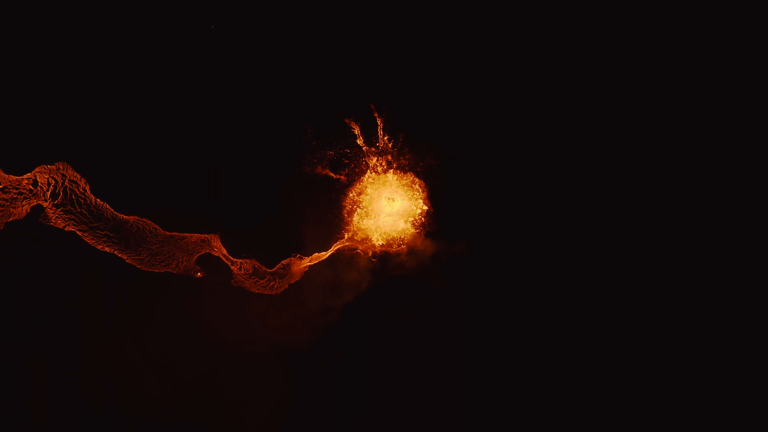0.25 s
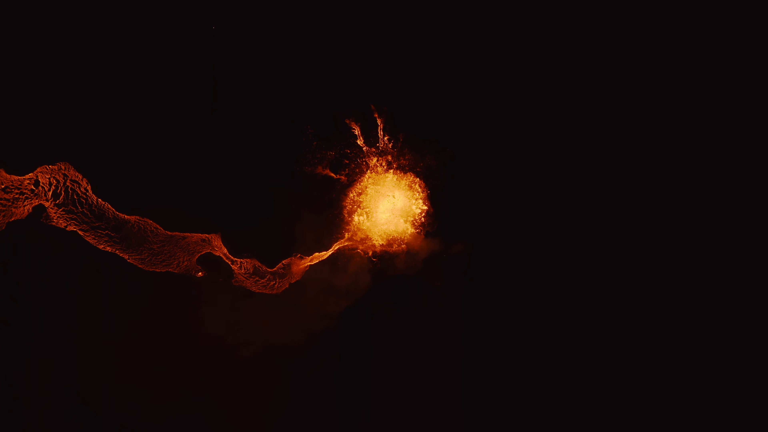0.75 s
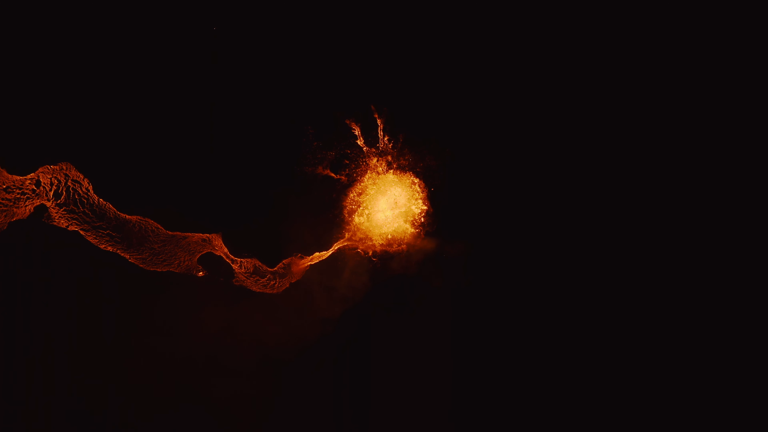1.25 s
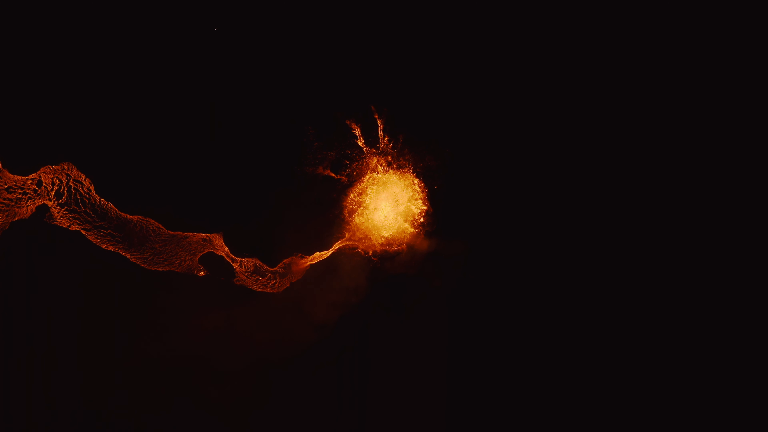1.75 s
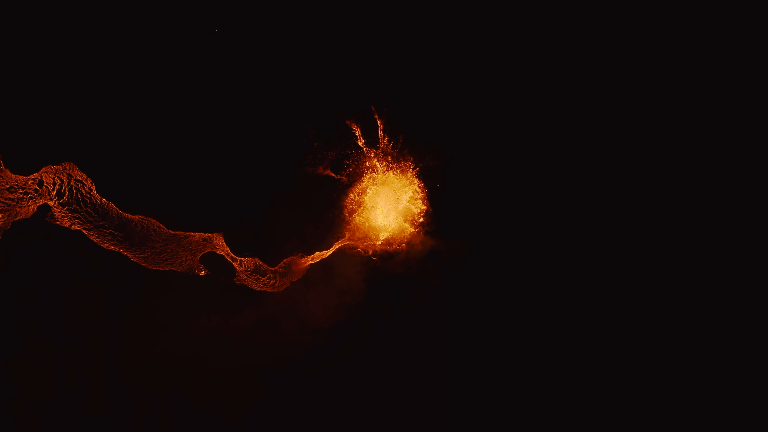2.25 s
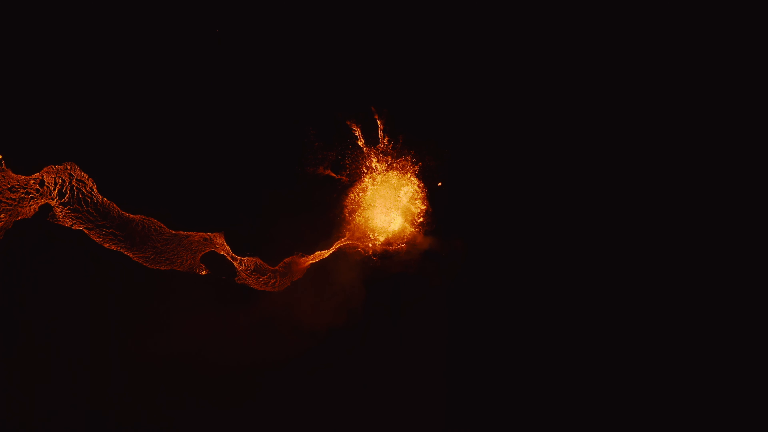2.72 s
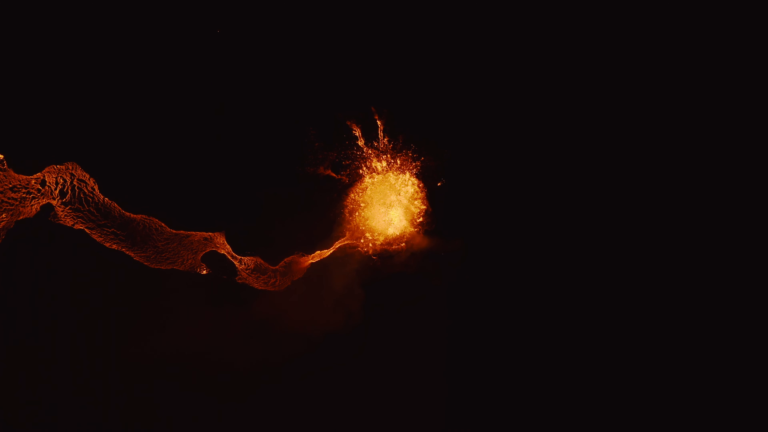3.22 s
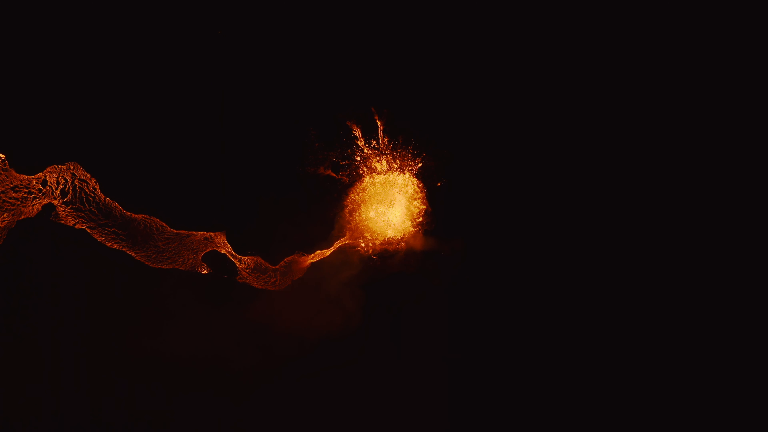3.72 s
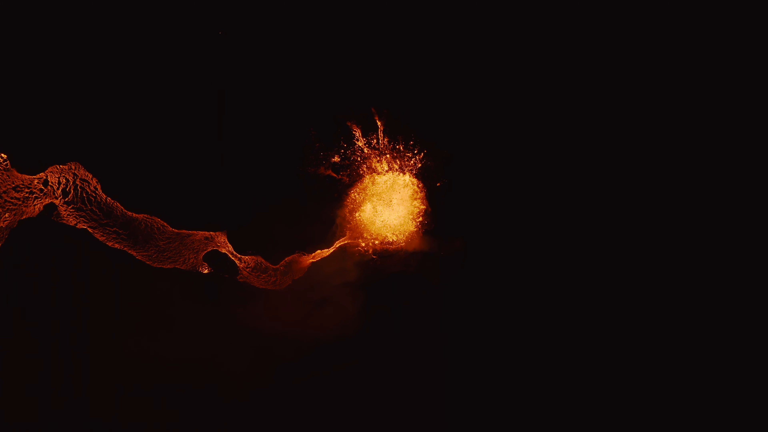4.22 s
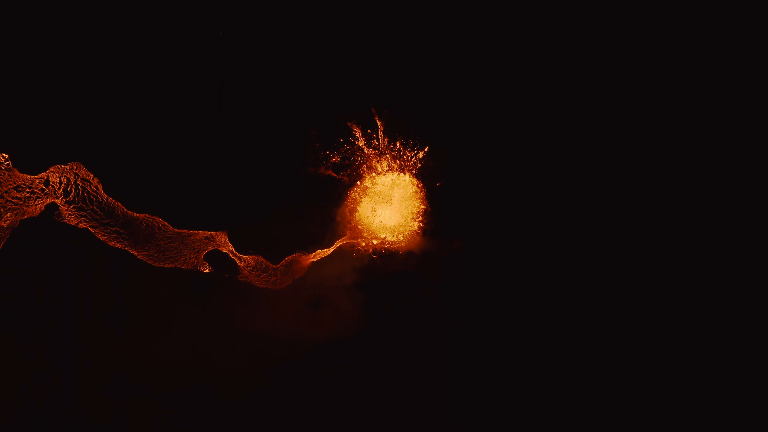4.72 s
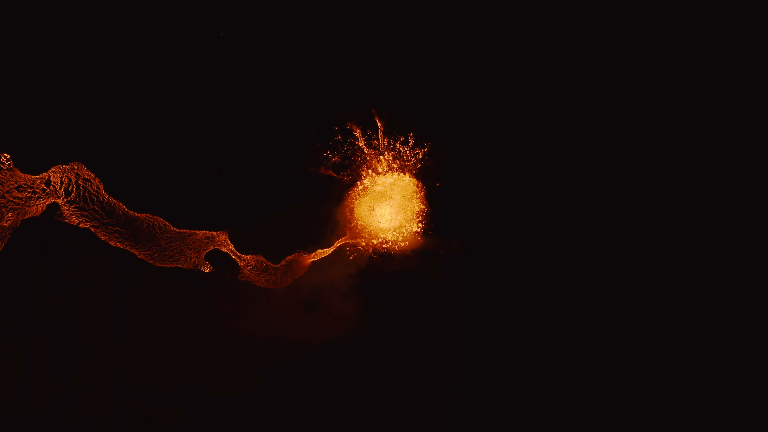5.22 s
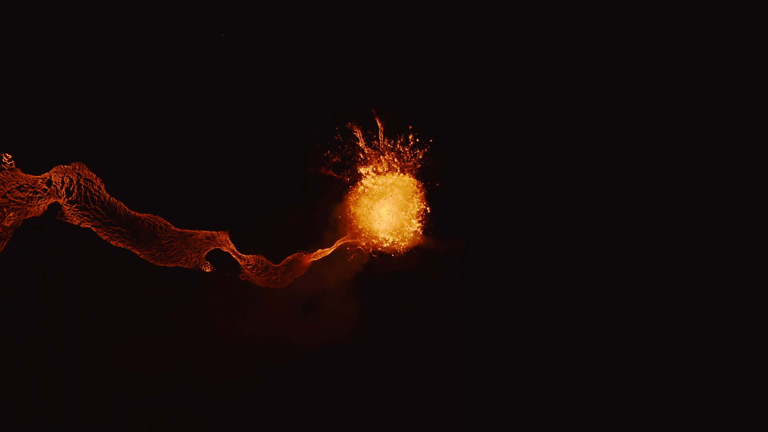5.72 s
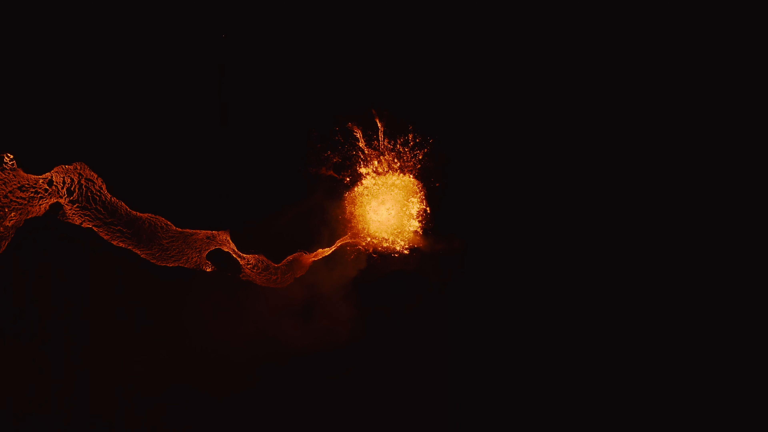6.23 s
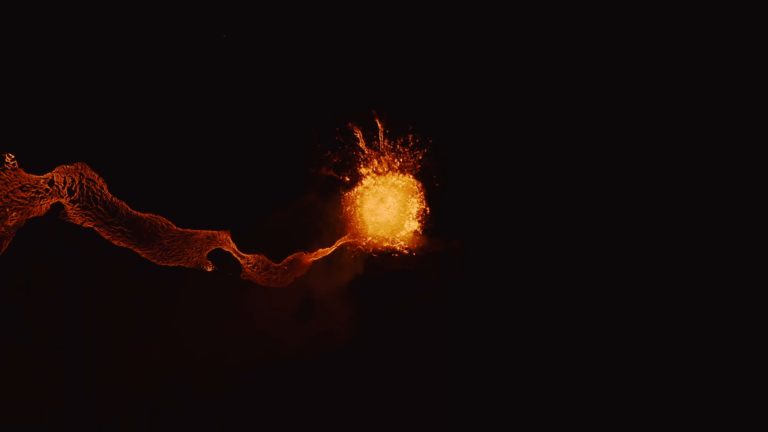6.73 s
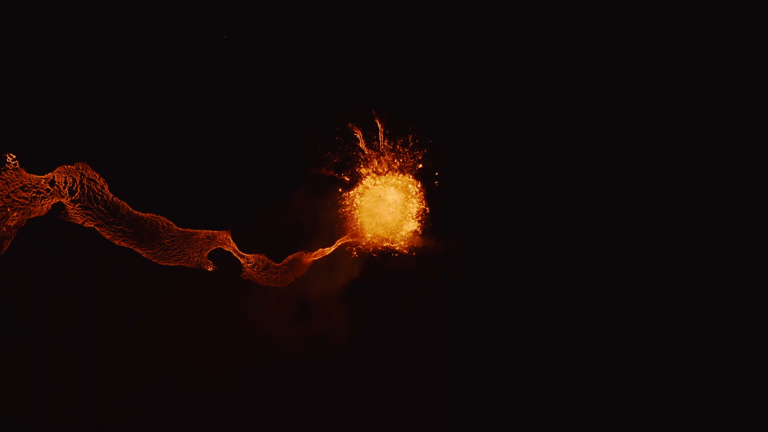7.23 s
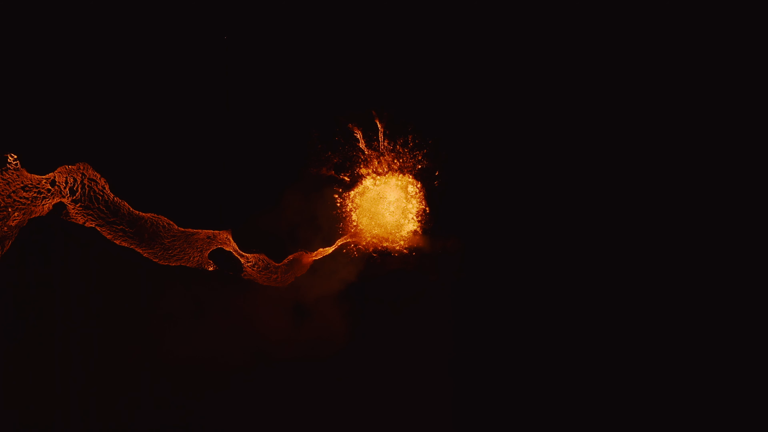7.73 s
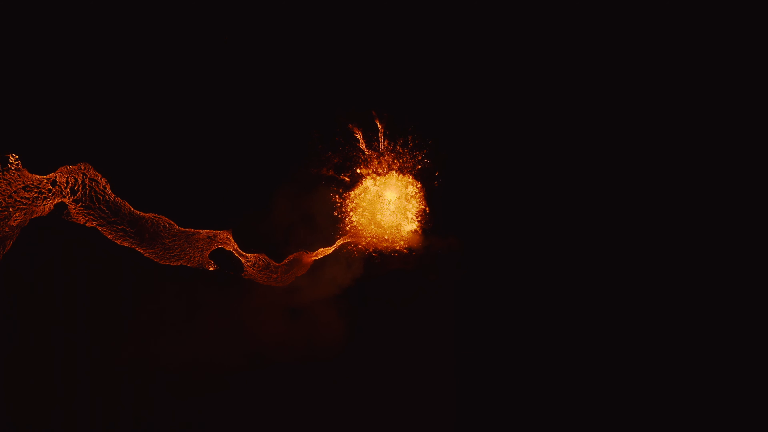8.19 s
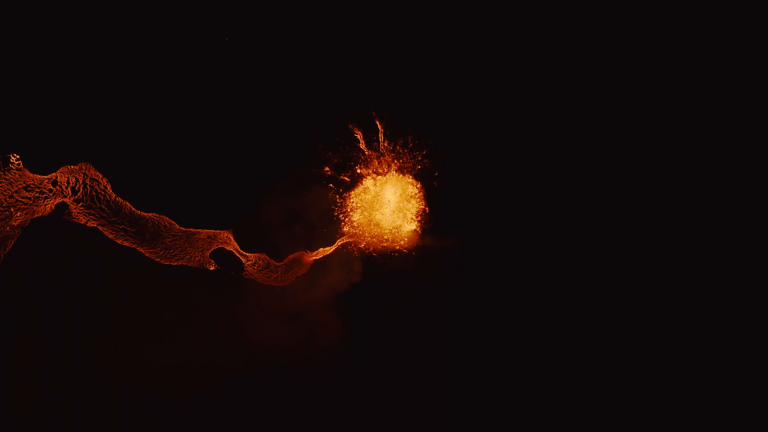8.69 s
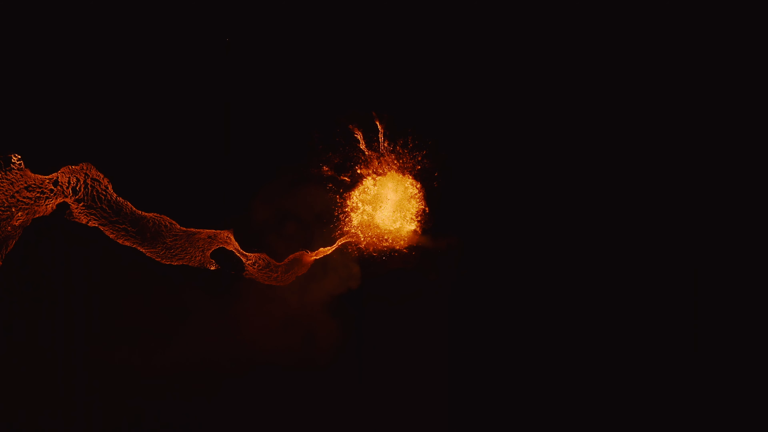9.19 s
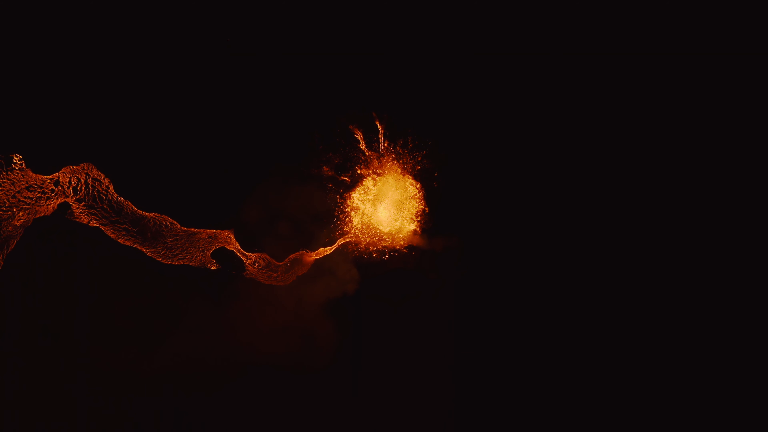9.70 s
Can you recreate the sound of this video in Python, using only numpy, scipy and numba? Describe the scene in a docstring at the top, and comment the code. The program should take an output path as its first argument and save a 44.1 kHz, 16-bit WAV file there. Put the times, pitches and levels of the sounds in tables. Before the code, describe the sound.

Outdoors at night, an erupting crater heard from some way off gives a deep, hollow, throbbing rumble under a muffled, crackling gas roar. It eases slightly, then surges after three seconds into a cluster of heavy thuds and pops, and afterwards continues unevenly. Near the microphone, low gusts flutter softly and small ash grains tick faintly.

```python
"""A volcanic crater at night, heard from some way off: bursting gas slugs make a deep rumble of filtered
impulses and noise that rings with the crater. Over it roars a gas jet, noise mixed with small shocks,
which surges after three seconds. The biggest slugs thud and pop as single pulses. The vent arrives
directly and off the ground. Close by, low noise in gusts buffets the microphone, and small grains,
perhaps ash, tick down as clicks with short noise tails."""
import sys
import numpy as np
from scipy import signal
from scipy.fft import rfft, irfft, next_fast_len
from scipy.io import wavfile
from numba import njit

SR = 44100
rng = np.random.default_rng(int(sys.argv[2]) if len(sys.argv) > 2 else 0)


def generate_wav(sig):
    """Save sig (samples, or channels by samples) to the path in sys.argv[1] as 16-bit PCM at SR."""
    pcm = np.round(np.clip(np.atleast_2d(sig).T, -1, 1) * 32767).astype(np.int16)
    wavfile.write(sys.argv[1], SR, pcm)


N = 438794


def undb(db):
    """Decibels to gain."""
    return 10 ** (np.asarray(db) / 20)


def unit(x):
    """Scale to rms 1."""
    return x / np.sqrt(np.mean(x ** 2))


def curve(points):
    """(time [s], value) points joined by straight lines."""
    return np.interp(np.arange(N) / SR, *np.transpose(points))


def swell(s, length):
    """A smooth rise and fall that peaks at 1 at time s and stays above one half for length seconds."""
    distance = 2 * (np.arange(N) / SR - s) / length
    return np.exp2(-np.minimum(distance ** 2, 20))


def walk(rate):
    """Random drift with a new target rate times a second, joined by straight lines; spread near 1."""
    knots = rng.standard_normal(4096)
    return 1.2 * np.interp(np.arange(N) / SR * rate, np.arange(len(knots)), knots)


def shower(rate, spread_db):
    """Impulses at random moments, rate a second, of either sign and unequal but bounded size; rms 1."""
    falls = rng.random(N) < rate / SR
    size = undb(spread_db * np.clip(rng.standard_normal(N), -2, 2))
    return unit(falls * rng.choice([-1, 1], N) * size)


def colour(x, points):
    """Causal filter with the gain of (frequency [Hz], level [dB]) points; steeper above the last one."""
    size = next_fast_len(N + SR // 2, True)
    hz, db = np.transpose(points)
    freqs = np.maximum(np.arange(size // 2 + 1) * SR / size, 1)
    gain = undb(np.interp(np.log(freqs), np.log(hz), db))
    gain *= np.minimum(hz[-1] / freqs, 1) ** 3
    # folding the cepstrum forward gives minimum phase, so nothing sounds ahead of its cause
    cepstrum = irfft(np.log(gain), size)
    cepstrum[1:size // 2] *= 2
    cepstrum[size // 2 + 1:] = 0
    response = np.exp(rfft(cepstrum))
    return irfft(rfft(x, size) * response, size)[:N]


def split(x, hz):
    """The parts of a sound below and above a frequency."""
    low = signal.sosfiltfilt(signal.butter(3, hz, fs=SR, output="sos"), x)
    return low, x - low


@njit
def resonate(x, hz, width_share):
    """Band-pass with gain 1 at a centre that may move; its width is a share of the centre."""
    y, band, low = np.empty(len(x)), 0., 0.
    for i in range(len(x)):
        g = np.tan(np.pi * hz[i] / SR)
        v = (band + g * (x[i] - low)) / (1 + g * (g + width_share))
        band, low, y[i] = 2 * v - band, low + 2 * g * v, width_share * v
    return y


# gusts that strike the microphone: (time [s], length [s], relative level [dB])
GUSTS = [(0.128, 0.061, -29), (0.606, 0.048, -39), (4.082, 0.3, -35), (5.906, 0.019, -28),
         (6.196, 0.068, -33.5), (6.48, 0.22, -31), (6.63, 0.13, -27), (7.14, 0.11, -31), (7.28, 0.11, -29),
         (7.428, 0.033, -25.5), (7.88, 0.076, -29.5), (8.176, 0.06, -30), (8.5, 0.048, -28),
         (8.92, 0.14, -34), (9.485, 0.049, -35), (9.837, 0.12, -27.5)]


def gusts():
    """Power of the gusts over time, each one a smooth shove of air."""
    return sum(undb(db) ** 2 * swell(s, length) for s, length, db in GUSTS)


# light breeze at the microphone: (time [s], relative level [dB])
BREEZE = [(0, -46.5), (1, -50.5), (2.3, -43.5), (3.2, -47), (5.2, -45.5), (6.5, -46), (8.5, -38.3),
          (9.95, -41.5)]
# spectrum of air buffeting the microphone: (frequency [Hz], relative level [dB])
WIND_SPECTRUM = [(6, -9.5), (15, -7), (28, 3.5), (42, 2.5), (60, 0), (85, -8), (150, -28), (400, -53.5)]


def wind(buffet_db=-0.5, breeze_gain_db=3.5, gust_gain_db=0.2):
    """Eddies push on the microphone in slow, uneven shoves: a light breeze with short gusts."""
    breeze = undb(curve(BREEZE) + breeze_gain_db + buffet_db * walk(rate=14))
    power = breeze ** 2 + undb(gust_gain_db) ** 2 * gusts()
    turbulence = unit(colour(rng.standard_normal(N), WIND_SPECTRUM))
    return turbulence * np.sqrt(power)


# larger grains landing nearby: (time [s], relative peak [dB], brightness [0-1])
TICKS = [(0.411, -55, 0.8), (0.511, -50, 0.6), (0.612, -58, .7), (0.73, -45, 0.9), (0.835, -55, 0.9),
         (0.899, -52, 0.3), (0.948, -59, .6), (1.407, -57, .4), (1.52, -56, .5), (1.567, -56, 1),
         (1.682, -54, 0.8), (2.125, -43.5, 0), (2.298, -59, .7), (2.422, -59, 0.7), (2.434, -53, .6),
         (2.613, -58, 0.9), (2.653, -54, 0.8), (2.879, -53.5, 1.0), (3.089, -48, 0.8), (3.199, -60, .8),
         (3.56, -52.5, 0.96), (3.631, -56, 0.6), (4.123, -42, 0.25), (4.59, -56, 1), (4.695, -59, 0.9),
         (4.824, -60, 1), (4.927, -54, 0.4), (5.04, -59, 0.5), (5.224, -62, .7), (5.357, -58, .8),
         (5.593, -58, .7), (5.742, -57, .6), (5.985, -45, 0.5), (6.2, -53.5, 0.7), (6.322, -52, 0.9),
         (6.394, -60, .7), (6.697, -62, 1), (6.972, -55, 0.7), (7.026, -55, 1.0), (7.402, -55, 0.7),
         (8.083, -59, .7), (8.254, -52.5, 0.8), (8.36, -53, 1.0), (8.452, -49, 0.1), (8.632, -58, .7),
         (8.808, -58, .9), (9.016, -56, .7), (9.114, -56, .9), (9.276, -54, 1.0), (9.29, -56, .8),
         (9.303, -58, .9), (9.5, -55, .9)]
REBOUND_S, REBOUND_DB = 0.0015, -8  # each grain hops once


def ticks(tick_db=10, rattle_db=-18, rattle_t60=0.0085, scatter_db=-30, scatter_t60=0.054):
    """A larger grain lands with a dry tick, hops once and stirs the grit; a soft landing is dull."""
    t = np.arange(SR // 10) / SR
    out = np.zeros(N + len(t))
    low_pass = signal.butter(4, 7500, fs=SR)
    high_pass = signal.butter(4, 7500, "highpass", fs=SR)
    for s, db, brightness in TICKS:
        grit = undb(rattle_db - 60 * t / rattle_t60) + undb(scatter_db - 60 * t / scatter_t60)
        tick = grit * rng.standard_normal(len(t))
        tick[0] += 1
        tick[int(REBOUND_S * SR)] += undb(REBOUND_DB)
        dull = signal.lfilter(*low_pass, tick)
        bright = signal.lfilter(*high_pass, tick)
        start = int(s * SR)
        out[start:start + len(t)] += undb(db + tick_db) * (dull + brightness * bright)
    return out[:N]


# brief trickles of grit: (time [s], relative level [dB], length [s])
TRICKLES = [(1.202, -70, .022), (2.775, -79, 0.02), (4.453, -81, .02), (5.33, -78, .016),
            (7.415, -73, 0.021), (7.985, -70, .02), (8.55, -80, .05), (9.2, -79, 0.025),
            (9.432, -71, 0.024)]
# spectrum of landing grains: (frequency [Hz], relative level [dB])
GRAIN_SPECTRUM = [(1500, -26.5), (3500, -10.5), (4500, 0), (5300, -1), (6000, 3), (7100, -1.5), (8700, -7),
                  (9600, -5.5), (10600, -8.5), (12000, -5.5), (14000, -17), (16000, -21.5)]
# fine grains sift down ever more thickly
SIFT_START_DB, SIFT_RISE_DB_PER_S = -81.5, 0.4


def grains(small_db=-1.5, rattle_t60=0.007, hiss_db=0.0, blown_db=-50):
    """Ticks over a patter of small grains; the finest merge into a faint sizzle that gusts thicken."""
    t = np.arange(N) / SR
    sift = undb(SIFT_START_DB + SIFT_RISE_DB_PER_S * t)
    landings = np.abs(shower(rate=45, spread_db=3.5))
    decay = undb(-60 * t[:SR // 10] / rattle_t60)
    rattles = signal.fftconvolve(landings, decay)[:N]
    patter = unit(rattles * rng.standard_normal(N))
    # smaller, slower grains land more softly, so their ticks are duller
    small = signal.lfilter(*signal.butter(2, 9000, fs=SR), patter) * sift
    trickle = sum(undb(db) * swell(s, length) for s, db, length in TRICKLES)
    hiss = np.hypot(sift * undb(hiss_db), undb(blown_db) * np.sqrt(gusts()))
    sizzle = shower(rate=9000, spread_db=2.5) * undb(1.3 * walk(rate=70))
    return colour(ticks() + undb(small_db) * small + (trickle + hiss) * sizzle, GRAIN_SPECTRUM)


GROUND_LAG_S, GROUND_SHARE = 0.00543, 0.14


def ground(x, low_hz=600, high_hz=1600):
    """Porous ground returns a late, inverted copy of the middle range, which ripples the roar's colour."""
    sos = signal.butter(1, [low_hz, high_hz], "bandpass", fs=SR, output="sos")
    samples = np.arange(N)
    middle = signal.sosfiltfilt(sos, x)
    bounce = np.interp(samples - GROUND_LAG_S * SR, samples, middle, left=0)
    return x - GROUND_SHARE * bounce


# spectrum of the churning and bursting lava: (frequency [Hz], relative level [dB])
RUMBLE_SPECTRUM = [(25, -25), (45, -5.5), (70, 0.5), (100, 1.1), (160, -3), (250, -5.5), (330, -13),
                   (500, -22.5), (1000, -71)]
# the hollow ring of the crater shifts as the lava heaves: (time [s], centre [Hz])
CRATER = [(0, 106.5), (1.3, 135), (2.0, 139), (2.8, 134.6), (3.5, 216.4), (4.05, 130.4), (4.5, 140),
          (5.0, 139.7), (5.5, 135), (5.95, 141), (6.65, 201), (7.15, 108), (8.4, 103.7), (9.1, 169),
          (9.95, 149.6)]
# how strongly the crater rings: (time [s], share of the rumble [0-1])
RING = [(0, .45), (1.4, .45), (2.2, .3), (4.2, .35), (4.9, 0.93), (5.9, .42), (8.6, .4), (9.4, .65)]


def rumble(burst_share=0.65, throb_db=0.12, ring_width=0.48):
    """Gas slugs burst in the lava, dozens a second, over the churning of the crater, which rings too."""
    pulses = shower(rate=90, spread_db=3.5)
    churn = rng.standard_normal(N) * undb(throb_db * walk(rate=13))
    sound = colour(burst_share * pulses + churn, RUMBLE_SPECTRUM)
    ring = resonate(sound, curve(CRATER), ring_width)
    return unit(sound + curve(RING) * ring)


# biggest gas slugs, large ones thud and small ones pop: (time [s], pulse peak [dB], pitch [Hz])
BURSTS = [(0.196, -27.5, 111), (0.704, -30, 220), (1.338, -28, 131), (1.797, -33, 280), (1.824, -32, 130),
          (1.891, -32, 418), (2.764, -32, 260), (3.299, -25, 230), (3.377, -24.5, 280), (3.436, -19, 115),
          (3.523, -24, 290), (3.68, -21, 310), (3.809, -18, 100), (3.85, -22, 130), (3.981, -20, 99),
          (4.077, -18, 94), (4.101, -24, 110), (4.172, -23.5, 155), (4.316, -25, 140), (4.622, -23.5, 260),
          (4.712, -22, 135), (4.887, -23.5, 143), (4.943, -25.5, 135), (5.09, -25, 134), (5.13, -33, 422),
          (5.902, -26, 110), (6.621, -20, 78), (7.118, -24, 94), (7.268, -26.5, 380), (7.4, -28, 240),
          (8.162, -32, 230), (8.576, -24.5, 114), (9.485, -21, 98), (9.538, -27, 240)]


def bursts(roll_db=-12, roll_t60=0.1, roll_width=0.67):
    """A big slug bursts with one push and pull of air, then rolls dully around the crater walls."""
    t = np.arange(-(SR // 50), SR // 3) / SR
    out = np.zeros(N + len(t))
    for s, db, hz in BURSTS:
        phase = 2 * np.pi * hz * t
        pulse = -phase * np.exp((1 - phase ** 2) / 2)
        walls = rng.standard_normal(len(t))
        for _ in range(3):
            walls = resonate(walls, np.full(len(t), float(hz)), roll_width)
        onset = np.tanh(np.maximum(phase, 0) / np.pi) ** 2
        roll = unit(walls) * onset * undb(roll_db - 60 * np.abs(t) / roll_t60)
        start = int((s + t[0]) * SR)
        out[start:start + len(t)] += undb(db) * (pulse + roll)
    return out[:N]


# spectrum of the gas jet from afar: (frequency [Hz], relative level [dB])
JET_SPECTRUM = [(100, -7.5), (220, -6.5), (330, 0.35), (500, -2.5), (700, -8.5), (1050, -15), (1600, -19.5),
                (2500, -27.5), (3300, -34), (4200, -41.5), (5200, -53.5), (8000, -98)]


def jet(crackle_share=0.43, pop_share=0.22, flutter_db=0.79):
    """Turbulent gas flutters and sheds small shocks and larger pops; the long air path dulls its treble."""
    shocks = shower(rate=1200, spread_db=2)
    pops = shower(rate=25, spread_db=3)
    eddies = rng.standard_normal(N)
    gas = eddies + crackle_share * shocks + pop_share * pops
    return unit(colour(gas * undb(flutter_db * walk(rate=25)), JET_SPECTRUM))


# how hard the vent blows, as the level of its roar: (time [s], relative level [dB])
EFFORT = [(0.0, -46.5), (0.3, -47), (1.0, -49), (1.5, -50), (1.85, -47.5), (2.2, -47.5), (2.8, -45),
          (3.45, -39.5), (3.75, -38), (4.0, -39.5), (4.45, -43), (5.0, -42.5), (5.55, -45), (6.1, -40.5),
          (6.5, -44), (7.1, -42.5), (8.55, -47), (9.95, -42.5)]
# surges and lulls of the gas: (time [s], length [s], lift of the roar [dB], lift of the rumble [dB])
SURGES = [(0.243, 0.068, 2.5, 3.5), (0.484, .1, 2, 0), (1.343, 0.077, -1, 4.5), (2.15, 0.48, -0.45, -1),
          (2.7, 0.3, -1, -1), (2.918, 0.025, -0.5, 4), (3.153, 0.16, 0.2, -3), (3.268, 0.067, 2.5, -1),
          (3.39, 0.16, 5, 1.5), (3.55, 0.091, 2, 0.5), (3.674, 0.086, 4.5, 0), (3.853, 0.08, 4, 0),
          (3.99, 0.12, -0.5, 0), (4.188, 0.12, 1.5, 3), (4.332, 0.026, 1, 8), (4.374, 0.058, -4, -4),
          (4.51, .05, -3.5, 0), (4.684, 0.075, 2, 4.5), (4.782, 0.061, 0, -3.5), (4.938, 0.2, -2, 2),
          (5.075, 0.032, 1, 6.5), (5.3, .1, 1, -1.5), (5.784, 0.15, -0.5, 4), (6.216, 0.082, 3, 2.5),
          (6.62, 0.03, 2, 6.5), (6.853, .16, 2, -2.5), (6.997, 0.068, 2.6, 2.5), (7.128, 0.025, 2, 3),
          (7.263, 0.079, 2, -2.5), (7.557, 0.23, 1.5, 2.5), (8.5, 0.25, -0.9, 0), (9.5, 0.27, -0.5, 1)]
# treble of the roar: (time [s], relative level [dB])
TREBLE = [(0, 1.5), (1.3, 2.5), (2.9, 0.8), (3.35, 0.3), (3.7, -0.7), (5.3, 2.4), (6.2, -1), (6.7, -3),
          (7.2, -2.5), (8.5, 2.5), (9.95, -0.2)]
TREBLE_FROM_HZ = 1500
# the rumble grows faster than the roar, but levels off once the vent is wide open
WIDE_OPEN_EFFORT_DB, RUMBLE_CEILING_DB, RUMBLE_GROWTH = -41, -28, 1.446  # ceiling before the gain below


def vent(rumble_gain_db=-0.3, jet_gain_db=1.11, unrest_db=0.5, heave_db=0.77):
    """One effort drives roar and rumble; surges and lulls move both, and the flow is never quite even."""
    effort_db = curve(EFFORT) + unrest_db * walk(rate=11)
    roar_db = effort_db + sum(lift_db * swell(s, length) for s, length, lift_db, _ in SURGES)
    drive = undb(RUMBLE_GROWTH * (effort_db - WIDE_OPEN_EFFORT_DB))
    body = undb(RUMBLE_CEILING_DB) * drive / np.hypot(1, drive)
    surge_db = sum(lift_db * swell(s, length) for s, length, _, lift_db in SURGES)
    surge_db = surge_db + heave_db * walk(rate=13)
    low, treble = split(jet(), TREBLE_FROM_HZ)
    roar = low + treble * undb(curve(TREBLE))
    return rumble() * body * undb(surge_db + rumble_gain_db) + roar * undb(roar_db + jet_gain_db)


def scene():
    """The distant vent, with wind and falling grains close by."""
    distant = ground(vent() + bursts())
    return (wind() + grains() + distant)[None]


TOP_HZ = 15500


def record(dry):
    """The recorder cuts the top with a steep low-pass."""
    return signal.sosfilt(signal.ellip(8, .2, 70, TOP_HZ, fs=SR, output="sos"), dry)


dry = scene()
out = record(dry)
generate_wav(out)
```